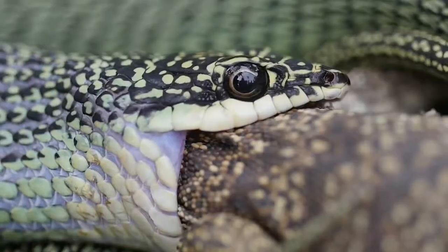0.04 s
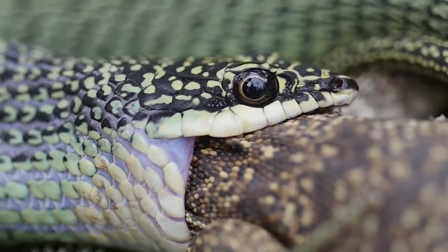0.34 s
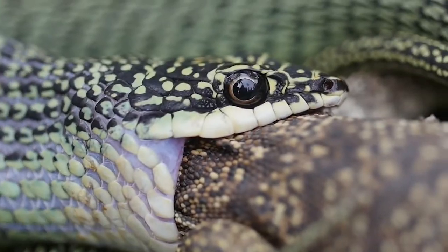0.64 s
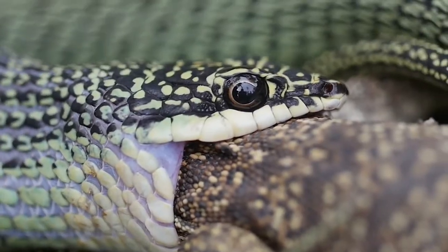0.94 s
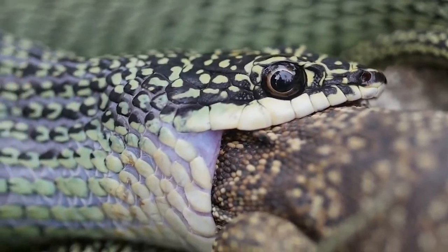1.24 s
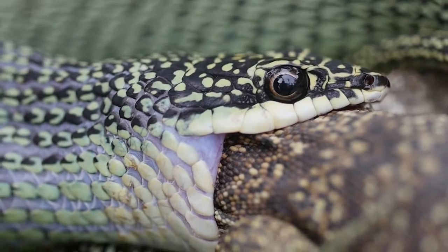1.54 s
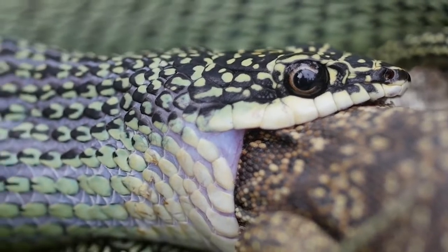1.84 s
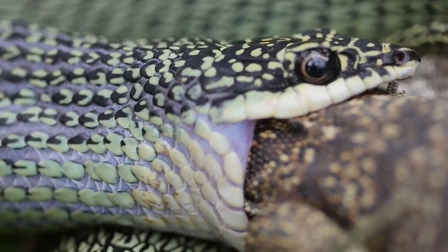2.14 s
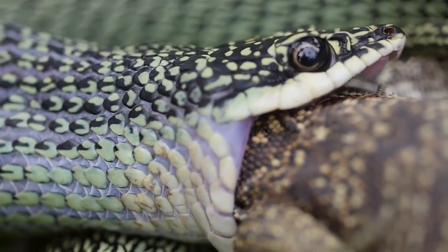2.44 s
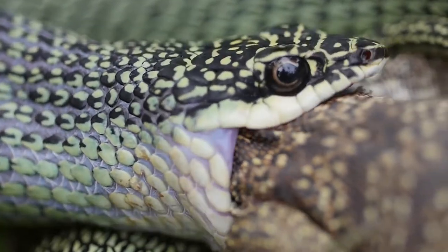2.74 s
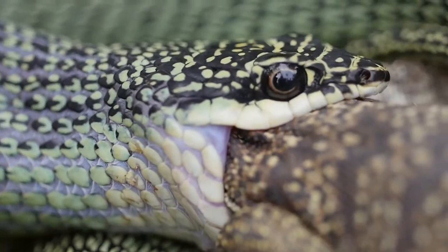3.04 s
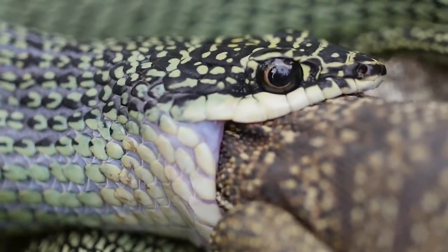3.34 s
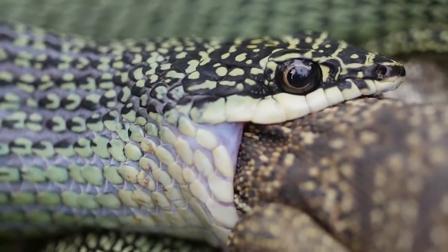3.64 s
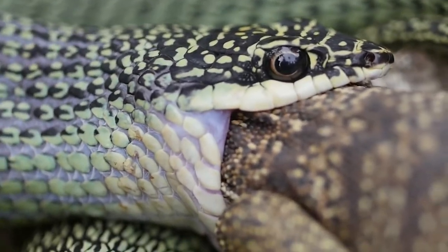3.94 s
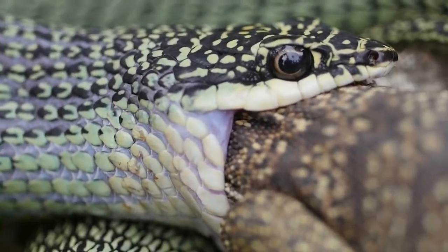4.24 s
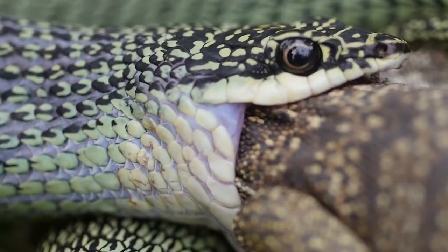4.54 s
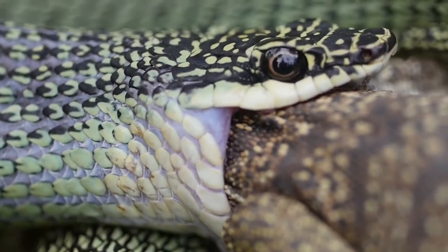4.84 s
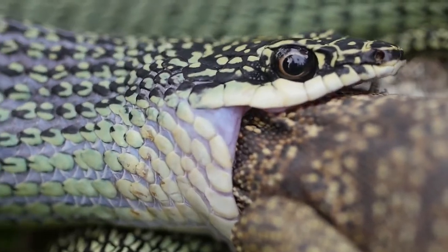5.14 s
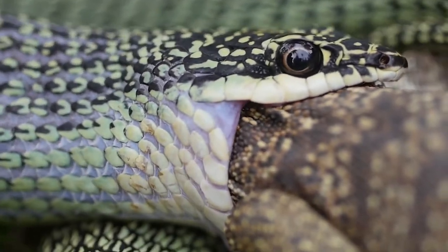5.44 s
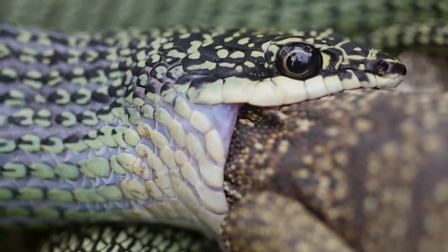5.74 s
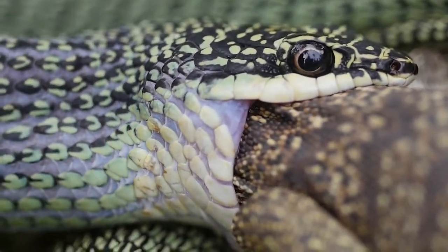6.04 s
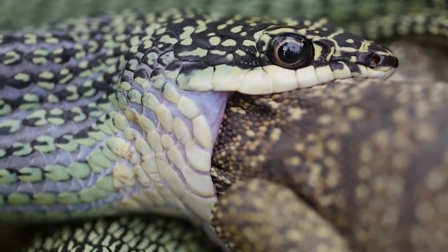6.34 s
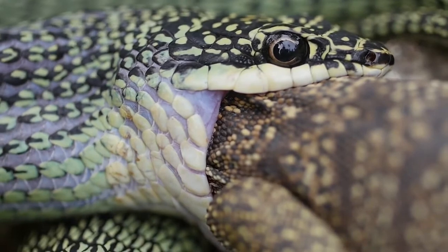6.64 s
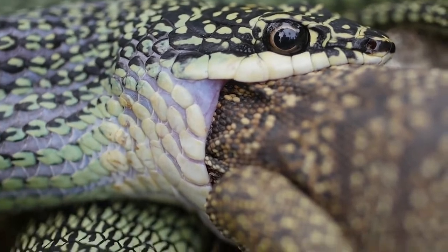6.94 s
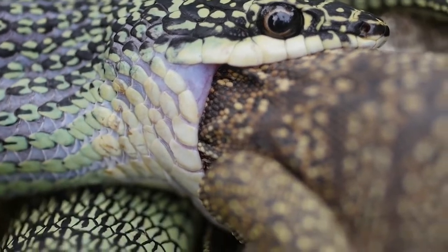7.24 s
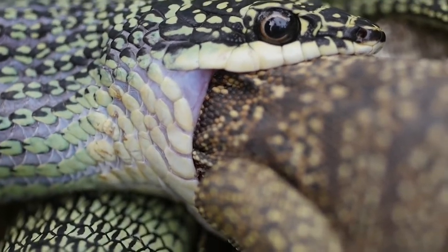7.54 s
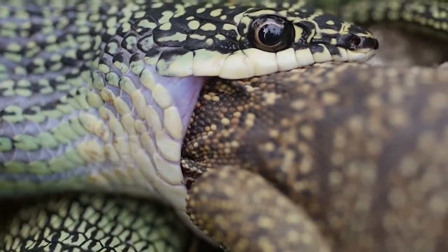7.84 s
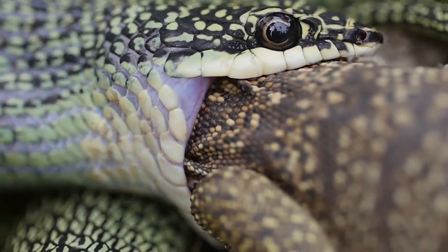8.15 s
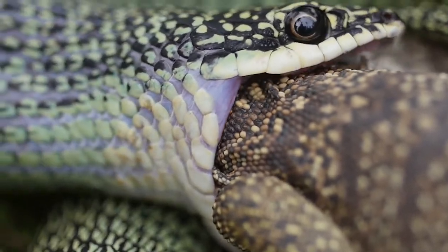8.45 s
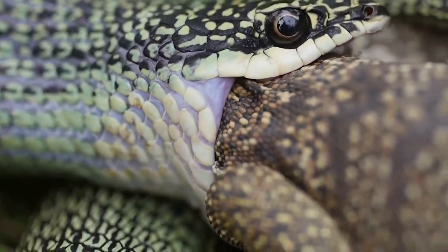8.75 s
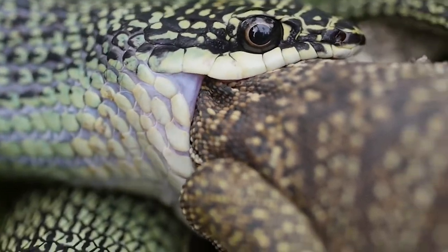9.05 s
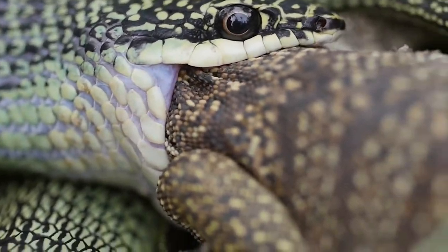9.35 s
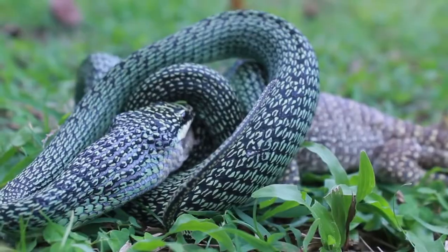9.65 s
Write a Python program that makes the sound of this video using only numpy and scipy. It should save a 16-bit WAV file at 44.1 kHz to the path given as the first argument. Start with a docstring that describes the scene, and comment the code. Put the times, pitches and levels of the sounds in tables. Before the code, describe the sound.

A soft, high insect shimmer, a light leafy hiss and a low hum of distant traffic run throughout, outdoors. From the start until about 6 seconds, a small bird whistles thirteen sharp, high falling notes, roughly two a second, by far the loudest sound. Arched notes and steeper ones mostly alternate, each trailing a short echo from the leaves. A far engine fades away by about 3.4 seconds. A few tiny dry ticks sound close by between 1.4 and 4.3 seconds. After the bird stops, a far bird pips faintly once at 6.2 seconds, then in a quick run from 7.2 to 8.4. From about 8.2 to 8.6 seconds comes one thin, very high whistle, breaking into airy hiss in its middle. At about 9.6 seconds the background changes suddenly: fewer insects, a brighter hiss and a nearer engine drone to the end.

```python
"""Insects hiss and traffic hums throughout. From the start a small bird whistles thirteen sharp falling
notes, arched and steep mostly in turn; leaves scatter each into a short tail. A few ticks sound close by
and a far engine fades away. After 6 s the bird has stopped and a far bird pips; just after 8 s comes one
thin high whistle. Near the end there are suddenly fewer insects, more hiss and a nearer engine drone."""
import sys
import numpy as np
from scipy import signal
from scipy.fft import rfft, irfft, next_fast_len
from scipy.io import wavfile
from scipy.ndimage import uniform_filter1d

SR = 44100
rng = np.random.default_rng(int(sys.argv[2]) if len(sys.argv) > 2 else 0)


def bounce(signal):
    """Save signal as a 16-bit WAV file at the path given by the first command-line argument."""
    frames = np.transpose(np.atleast_2d(signal))
    limited = np.clip(frames, -1, 1)
    pcm = np.round(limited * 32767).astype(np.int16)
    wavfile.write(sys.argv[1], SR, pcm)


N = 436590
TIME = np.arange(N) / SR


def undb(db):
    """Turn decibels into a factor to multiply a sound by."""
    return 10 ** (np.asarray(db, float) / 20)


def unit(x):
    """Scale a sound to an average power of 1."""
    return x / np.sqrt(np.mean(x ** 2))


def ramp(t, start, length):
    """Rise from 0 to 1 over a length of time."""
    return np.clip((t - start) / max(length, 1e-6), 0, 1)


def curve(rows, t=TIME):
    """Join the rows of a table by straight lines in time: one curve for each later column."""
    times, *columns = np.transpose(rows)
    return [np.interp(t, times, column) for column in columns]


def pan(x, side_db):
    """Place a sound by its left minus right level."""
    return x * undb(np.array([[side_db], [-side_db]]) / 2)


def add(out, x, start_s):
    """Mix a sound in at a given time."""
    i = max(int(start_s * SR), 0)
    out[:, i:i + x.shape[1]] += x[:, :N - i]


def walk(rate, size=N):
    """A smooth random wobble of about 1 either way, with `rate` new values a second."""
    hold = max(int(SR / rate), 1)
    steps = np.repeat(rng.standard_normal(size // hold + 1), hold)
    return 1.57 * uniform_filter1d(uniform_filter1d(steps, hold), hold)[:size]


def noise(gain, likeness, size=N):
    """Stereo noise shaped by gain(Hz); likeness 1 is the same in both ears, 0 is unrelated."""
    n = next_fast_len(size, True)
    spectrum = rfft(rng.standard_normal((2, n))) * gain(np.fft.rfftfreq(n, 1 / SR))
    mid, side = irfft(spectrum, n)[:, :size]
    return unit(np.sqrt(1 + likeness) * mid + np.sqrt(1 - likeness) * side * np.array([[1], [-1]]))


def colour(points, tilt_db=0):
    """A gain curve through (f/Hz, level/dB) points, tilted by tilt_db per octave."""
    hz, db = np.transpose(points)
    return lambda f: undb(np.interp(np.log(f + 1), np.log(hz), db + tilt_db * np.log2(hz)))


def bands(rows):
    """A gain curve of bell-shaped bands, each given as (f/Hz, width/Hz, level/dB)."""
    return lambda f: np.sqrt(sum(undb(db) ** 2 / width * .5 ** ((2 * (f - hz) / width) ** 2)
                                 for hz, width, db in rows))


def band_noise(rows, likeness):
    """Noise in bell-shaped bands, each at its own level."""
    return noise(bands(rows), likeness) * np.sqrt(sum(undb(db) ** 2 for _, _, db in rows))


def air(ending, leaves_db=-55, open_db=-55, breeze_db=-71):
    """A wide soft hiss of leaves, a faint breeze on the microphone and a brighter hiss at the end."""
    # tone colour of the leaves and of the brighter hiss: f/Hz, relative level/dB
    leaf_colour = [(200, -12), (600, 1), (1200, 2), (2000, -1), (3000, -3.5), (4200, -5), (6000, -10),
                   (7600, -12.5), (12000, -36), (15500, -104)]
    open_colour = [(400, -23), (1000, 3), (2500, 6.5), (3900, 0.5), (4800, 5), (5800, -4), (7500, -5),
                   (10000, -45.5), (15000, -32)]
    leaves = pan(noise(colour(leaf_colour), 0.01), 4.7) * undb(leaves_db + 0.5 * walk(2.04))
    breeze = noise(bands([(115, 900, 0)]), 0) * undb(breeze_db + 2 * walk(3.7))
    return leaves + breeze + ending * noise(colour(open_colour), 1.0) * undb(open_db)


def traffic(ending, rumble_db=-46.5, engine_db=-1.0):
    """A distant road rumbles, machines hum, one engine fades away and a nearer one drones at the end."""
    # tone colour of the road: f/Hz, relative level/dB
    road_colour = [(25, -38), (40, -50), (55, -14.5), (85, -9.5), (120, -2.5), (180, -1), (250, -5.5),
                   (350, -12), (500, -14.5), (800, -21), (1400, -29), (3000, -41)]
    # the far machines and the nearer engine: f/Hz, width/Hz, level/dB
    hum_bands = [(150.5, 8, -53), (173.4, 6.7, -52), (229.9, 6.2, -55), (263.8, 3.9, -62.5),
                 (298.3, 3.9, -61)]
    drone_bands = [(240, 20, -44.5), (256, 28, -57), (281, 6.3, -42.5)]
    # the far engine: t/s, firing rate/Hz, relative level/dB
    engine_path = [(0.0, 129.5, -49), (0.07, 127.5, -44.5), (0.85, 129.6, -50), (1.91, 131.3, -47.5),
                   (2.59, 126.1, -44.5), (3.38, 122.0, -56.5), (3.4, 120.5, -74)]
    rumble = noise(colour(road_colour), 1.0) * undb(rumble_db + 0.78 * walk(2.495))
    hum = band_noise(hum_bands, 1.0) * undb(-6 * (1 - ramp(TIME, 0, 4.3)))  # comes up, then holds
    t = TIME[:int(0.6 * SR)]
    hum_note = np.sin(2 * np.pi * 301 * t) * signal.windows.tukey(len(t), .4) * undb(-51)
    add(hum, hum_note[None], start_s=7.58)  # one tone of the hum stands out for a moment
    hz, db = curve(engine_path)
    phase = 2 * np.pi * np.cumsum(hz * (1 + 0.01 * walk(14.94))) / SR
    engine = np.sqrt(2) * np.sin(phase) * undb(engine_db + db + 2.0 * walk(8.73))
    return rumble + hum + engine + ending * band_noise(drone_bands, 1.0)


def insects(ending, chirp_hz=6.04, chirp_depth=0.25):
    """A cricket chirps under high shimmering choruses; at the end the highest stops, the others drop."""
    # the choruses and the cricket: f/Hz, width/Hz, level/dB
    chorus_bands = [(8220, 220, -65.5), (8660, 220, -66), (10060, 1010, -59)]
    cricket_band = [(4920, 580, -64)]
    low = band_noise(chorus_bands[:-1], 0.16) * (1 - 0.54 * ending)
    high = band_noise(chorus_bands[-1:], 0.39) * (1 - ending)
    beat = np.cos(2 * np.pi * chirp_hz * (TIME - 7.64) + .3 * walk(2))
    cricket = band_noise(cricket_band, 0.19) * (1 + chirp_depth * beat)
    return (low + high) * undb(.5 * walk(12)) + cricket


def foliage(x, near_db=-3.5, near_s=0.18, far_db=-7.0, far_s=0.67, build_s=.008, grain_db=6):
    """Echoes from many leaves and trunks: a dense cluster, then a longer tail, different at each ear."""
    t = TIME[:SR]
    echoes = rng.standard_normal((2, SR)) * undb(grain_db * rng.standard_normal((2, SR)))
    build_up = 1 - np.exp(-(t / build_s) ** 2)
    power = 0
    for db, fade_s in ((near_db, near_s), (far_db, far_s)):
        decay = undb(-60 * t / fade_s) * build_up
        power = power + (undb(db) * unit(decay)) ** 2 / SR
    return signal.fftconvolve(x[None], unit(echoes) * np.sqrt(power), axes=1)[:, :N]


def far_bird(pip_s=.06, slur=.05, waver=0.013, echo_db=5):
    """Soft wavering pips, each sliding down a little, that arrive only as echoes from the leaves."""
    # the pips: t/s, f/Hz, relative level/dB
    pips = [(6.19, 3845, -54), (7.2, 4000, -61), (7.335, 3600, -57), (7.48, 3610, -58), (7.62, 3640, -57),
            (7.745, 3710, -55), (7.91, 3690, -56), (8.07, 3615, -57), (8.13, 3820, -60), (8.23, 3670, -56),
            (8.37, 3640, -58)]
    out = np.zeros((1, N))
    slide = np.linspace(.5, -.5, int(pip_s * SR))
    for start_s, middle_hz, db in pips:
        hz = middle_hz * (1 + slur * slide + waver * walk(203, len(slide)))
        tone = np.sin(2 * np.pi * np.cumsum(hz) / SR)
        add(out, tone[None] * signal.windows.hann(len(slide)) * undb(db), start_s)
    return undb(echo_db) * foliage(out[0], far_db=-3.5, far_s=1.0)


def ticks(tail_db=-24, tail_s=0.095):
    """Tiny dry snaps: bursts of noise that die fast and leave a faint scattered tail."""
    # the snaps: t/s, level/dB, brightness/(dB per octave), decay/s, left minus right/dB
    snaps = [(1.38, -45, -2.5, 0.0096, 9), (2.438, -35, 0.5, 0.0018, 12.5), (3.157, -38, 1, 0.0013, 14),
             (4.064, -38.5, 1, 0.0021, 10), (4.274, -37, 2, 0.0015, 10), (7.235, -52, 6, 0.002, 0),
             (7.672, -56, 6, .002, 0)]
    # their tone colour: f/Hz, relative level/dB
    snap_colour = [(300, -20), (950, 4.5), (2000, -0.5), (3400, 6), (5000, -9), (8000, -7), (12000, -5.5),
                   (16000, -30)]
    out, t = np.zeros((2, N)), TIME[:SR // 8]
    for start_s, db, bright_db, decay_s, side_db in snaps:
        burst = noise(colour(snap_colour, bright_db), 1.0, len(t))
        fade = np.exp(-t / decay_s) + undb(tail_db) * np.exp(-t / tail_s)
        add(out, pan(burst * fade * undb(db), side_db), start_s)
    return out


def thin_tone(hz, db, waver=0.003, flutter_db=2.0):
    """An unsteady whistled tone that follows a pitch curve, a little to the left."""
    phase = 2 * np.pi * np.cumsum(hz * (1 + waver * walk(1100, len(hz)))) / SR
    return pan(np.sin(phase) * undb(db + flutter_db * walk(145, len(hz))), 1.8)


def whistles(tone_db=4, hiss_db=-51.5, peak_s=8.45, swell_s=.15, fade_s=0.11):
    """Short squeaks and one long thin whistle, which breaks into airy hiss in its middle."""
    # tone colour of the hiss: f/Hz, relative level/dB
    hiss_colour = [(4000, -28), (6300, -2), (7250, 8), (7900, -3), (9500, 3), (11700, 6), (13000, -3),
                   (15000, -8)]
    # the long whistle: t/s, f/Hz, relative level/dB
    whistle_path = [(8.18, 10838, -60), (8.202, 11027, -51), (8.284, 11536, -43.5), (8.36, 11520, -61),
                    (8.458, 11818, -60), (8.49, 11740, -46), (8.52, 11623, -46), (8.552, 10733, -49),
                    (8.57, 10999, -61)]
    # the sliding squeaks: t/s, length/s, first f/Hz, last f/Hz, level/dB
    squeaks = [(6.335, .06, 1900, 2010, -58), (8.138, 0.047, 11280, 11900, -45.5),
               (8.563, .026, 7550, 6950, -54)]
    from_peak = (TIME - peak_s) / np.where(TIME < peak_s, swell_s, fade_s)
    out = noise(colour(hiss_colour), 0.92) * undb(hiss_db) * np.exp(-from_peak ** 2)
    first_s, last_s = whistle_path[0][0], whistle_path[-1][0]
    hz, db = curve(whistle_path, np.arange(first_s, last_s, 1 / SR))
    add(out, thin_tone(hz, db + tone_db) * signal.windows.tukey(len(hz), .05), first_s)
    for start_s, length_s, first_hz, last_hz, db in squeaks:
        hz = np.linspace(first_hz, last_hz, int(length_s * SR))
        add(out, thin_tone(hz, db) * signal.windows.tukey(len(hz), .5), start_s)
    return out


def note_pitch(t, shape):
    """The pitch flicks up, holds, then falls fast at first and ever more slowly, with rounded corners."""
    rise = 1 - (1 - ramp(t, 0, shape["rise_s"])) ** 2
    fall = ramp(t, shape["rise_s"] + shape["hold_s"], shape["fall_s"]) ** shape["bend"]
    hz = shape["start_hz"] + (shape["top_hz"] - shape["start_hz"]) * rise
    hz -= (shape["top_hz"] - shape["end_hz"]) * fall
    return uniform_filter1d(hz, size=max(int(shape["rounding_s"] * SR), 1), mode="nearest")


def note_level(t, shape, body_db):
    """The level in dB: a note starts softly, swells a little in its second half and trails off."""
    flick = shape["flick_db"] * (1 - ramp(t, shape["flick_s"], shape["attack_s"]))
    swell = shape["swell_db"] * ramp(t, t[-1] / 2, t[-1] / 2)
    release = ramp(t, t[-1] - shape["trail_s"], shape["trail_s"])
    trail = shape["trail_db"] * release ** shape["trail_bend"]
    return uniform_filter1d(flick + body_db + swell + trail, size=60, mode="nearest")


def note(shape, stretch, pitch, head_db, slide_db, ease_s=0.017, head_rough=0.18, waver=.008, kink=.007):
    """A nearly pure whistle: a loud clean opening (the head), then a quieter, rougher slide down."""
    # faint higher tones: multiple of the pitch, relative level/dB
    overtones = [(2, -27.5), (3, -29.5), (4, -40)]
    size = int((shape["rise_s"] + shape["hold_s"] + shape["fall_s"]) * stretch * SR)
    t = np.arange(size) / SR / stretch
    sliding = ramp(t, shape["head_s"], ease_s)  # 0 in the head, 1 in the slide
    rough = head_rough + (1 - head_rough) * sliding
    wobble = waver * walk(450, size) + kink * walk(172, size)
    hz = note_pitch(t, shape) * pitch * (1 + rough * wobble)
    phase = 2 * np.pi * np.cumsum(hz) / SR
    flutter_db = 2.5 * rough * walk(400, size)
    db = note_level(t, shape, head_db + (slide_db - head_db) * sliding) + flutter_db
    tone = np.sin(phase)
    for k, overtone_db in overtones:
        tone += undb(overtone_db + 3 * walk(600, size)) * np.sin(k * phase) * (k * hz < SR / 2)
    return tone * undb(db) * signal.windows.tukey(size, .04)


def bird(end_side_db=2.5, rasp_db=-29):
    """Thirteen notes and their leaf echoes; each starts stronger on the right and ends on the left."""
    # the two kinds of note: f/Hz, t/s and level/dB of their parts, and how their curves bend
    arched = dict(start_hz=3783, top_hz=6108, end_hz=3568, rise_s=.014, hold_s=.0168, fall_s=.0695, bend=.55, rounding_s=.012, flick_db=-22, flick_s=.0003, attack_s=0.011, head_s=0.023, swell_db=2, trail_s=0.0075, trail_db=-13, trail_bend=1.6)
    steep = dict(start_hz=5016, top_hz=6677, end_hz=2856, rise_s=.006, hold_s=0.000814, fall_s=.076, bend=.53, rounding_s=0.0013, flick_db=-14.5, flick_s=0.0065, attack_s=0.0027, head_s=.013, swell_db=.5, trail_s=.0215, trail_db=-22, trail_bend=0.48)
    # the notes: t/s, arched 1 or steep 0, length factor, pitch factor, head level/dB, slide level/dB,
    # left minus right of the head/dB
    notes = [(.081, 1, 0.97, 1.004, -19, -29, -8), (0.5546, 0, 1.08, 1.015, -22, -28, -4.5),
             (1.034, 1, 0.97, .992, -20, -27.5, -4.5), (1.451, 0, 1.04, 1.007, -21, -27, -3.5),
             (1.9748, 0, 1.07, 1.001, -23, -29, -3.5), (2.466, 1, 0.94, .995, -23.5, -28.5, -4),
             (3.0183, 0, 0.97, 1.025, -23.5, -28, -4), (3.5028, 1, 0.99, 1, -23.5, -28.5, -5),
             (3.9742, 0, 1.1, 1.036, -23.5, -27.5, -3.5), (4.417, 1, 0.96, 1.004, -20.5, -29, -4.5),
             (4.886, 0, 1.09, 1.004, -24, -27.5, -3.5), (5.3385, 1, 0.96, 1, -18, -29.5, -5.5),
             (5.846, 0, 1.06, 1.014, -20.5, -28.5, -4)]
    # how strongly the leaves scatter each part of a note: share of its length, level/dB
    scatter = [(.2, -2.5), (.38, 5), (.6, 3), (.88, -0.5)]
    direct, scattered = np.zeros((2, N)), np.zeros((1, N))
    for start_s, is_arched, stretch, pitch, head_db, slide_db, head_side_db in notes:
        call = note(arched if is_arched else steep, stretch, pitch, head_db, slide_db)
        progress = np.linspace(0, 1, len(call))
        rasp = noise(bands([(13000, 7000, 0)]), 0.76, len(call))[0]
        call += rasp * undb(slide_db + rasp_db) * np.sin(np.pi * progress ** 2)  # rides on the slide
        side_db = np.interp(progress, [.35, .85], [head_side_db, end_side_db])
        add(direct, call * undb(np.array([side_db, -side_db]) / 2), start_s)
        add(scattered, call[None] * undb(curve(scatter, progress)[0]), start_s)
    return direct + foliage(scattered[0])


def scene(ending_s=9.57):
    """All the sources together."""
    ending = ramp(TIME, ending_s, 0.005)  # jumps from 0 to 1 and switches the background
    return bird() + far_bird() + ticks() + whistles() + insects(ending) + traffic(ending) + air(ending)


def record(dry, top_hz=15400):
    """A steep filter cuts off the highest treble."""
    return signal.sosfilt(signal.ellip(10, .2, 80, top_hz, fs=SR, output="sos"), dry)


dry = scene()
out = record(dry)
bounce(out)
```